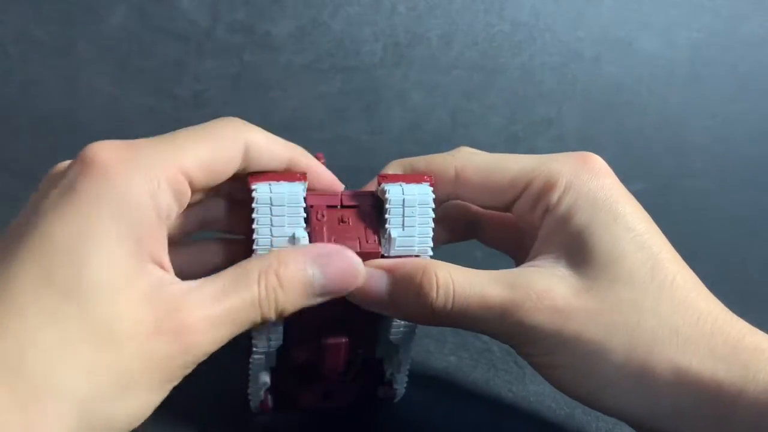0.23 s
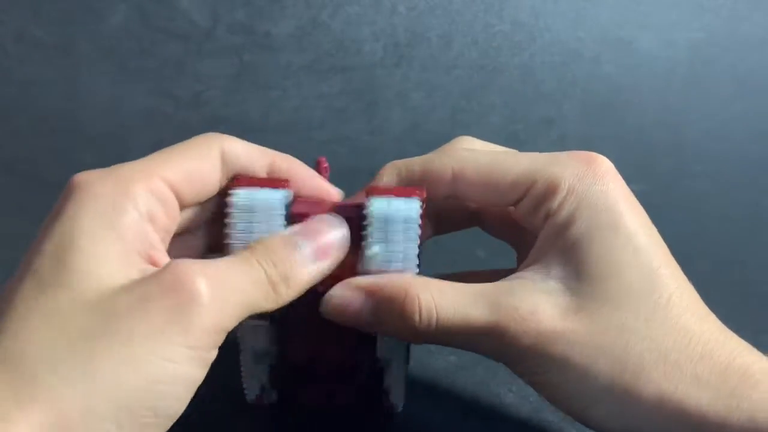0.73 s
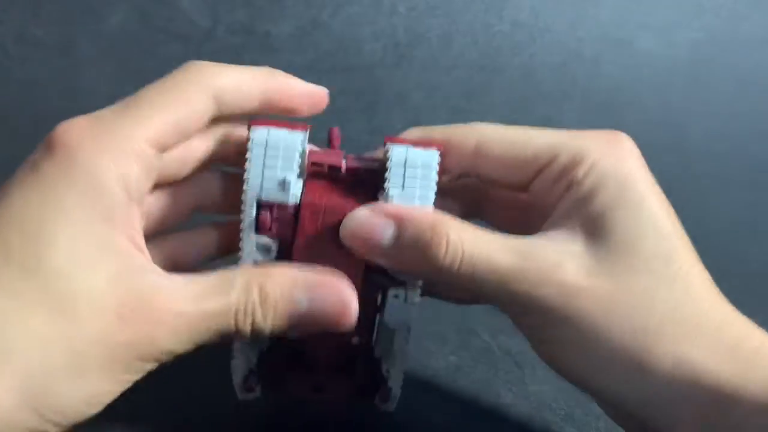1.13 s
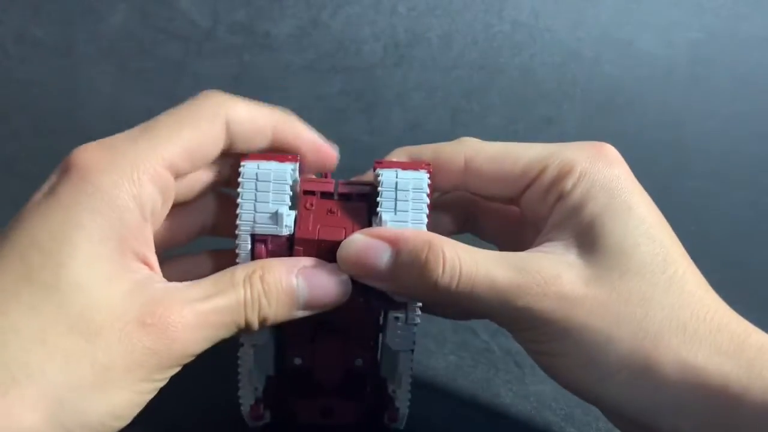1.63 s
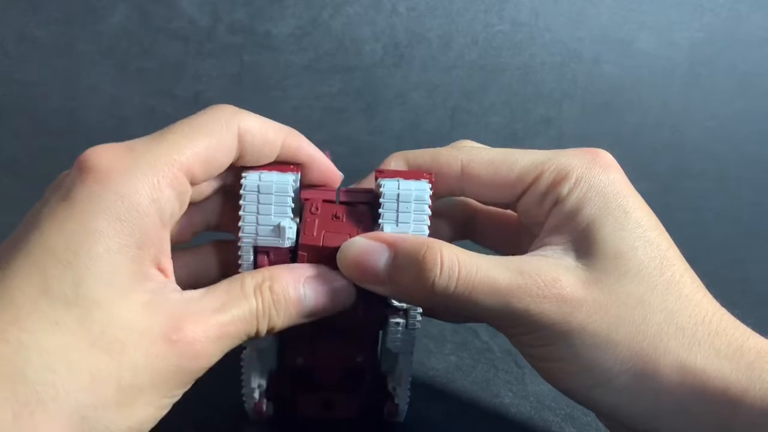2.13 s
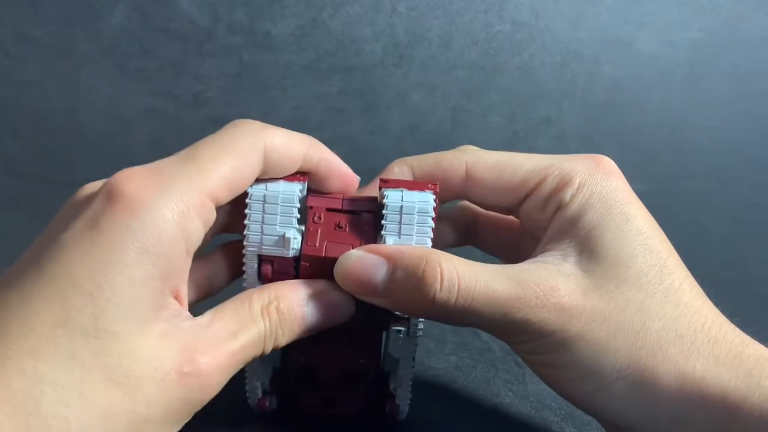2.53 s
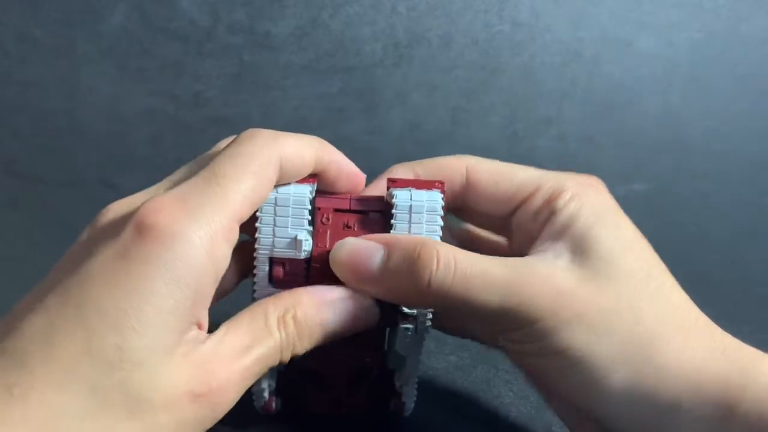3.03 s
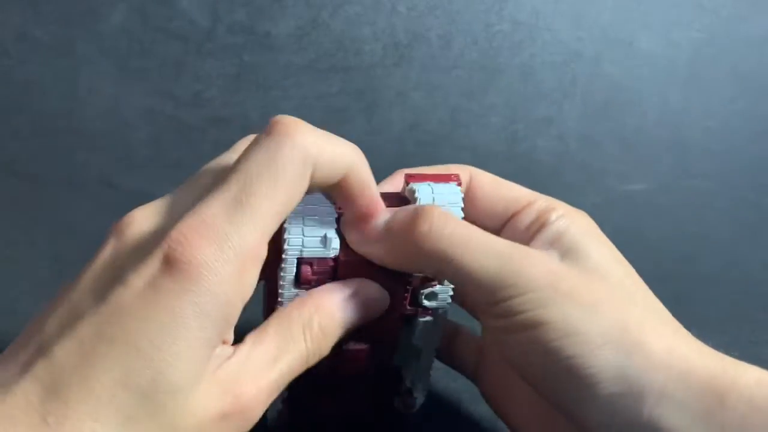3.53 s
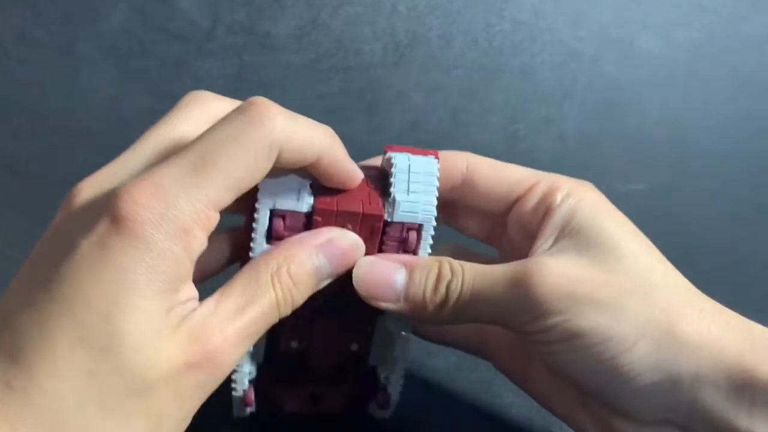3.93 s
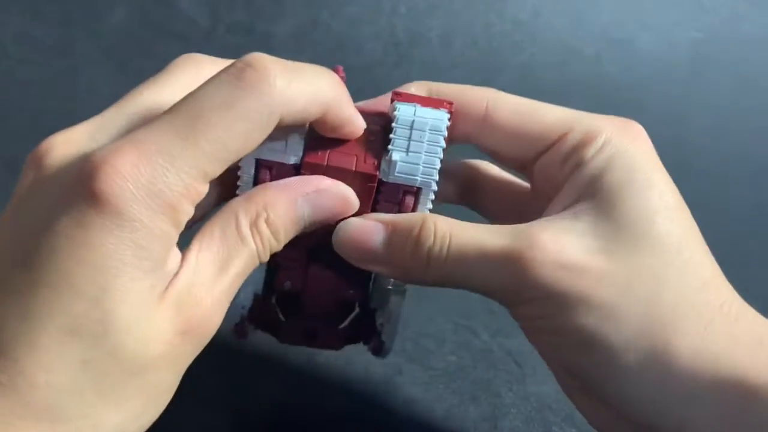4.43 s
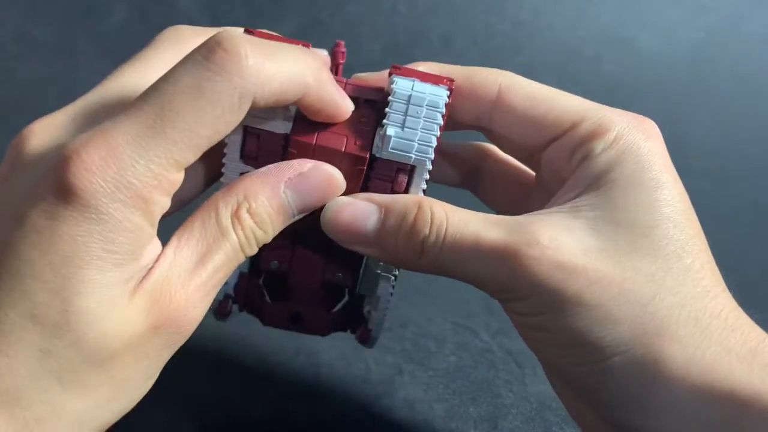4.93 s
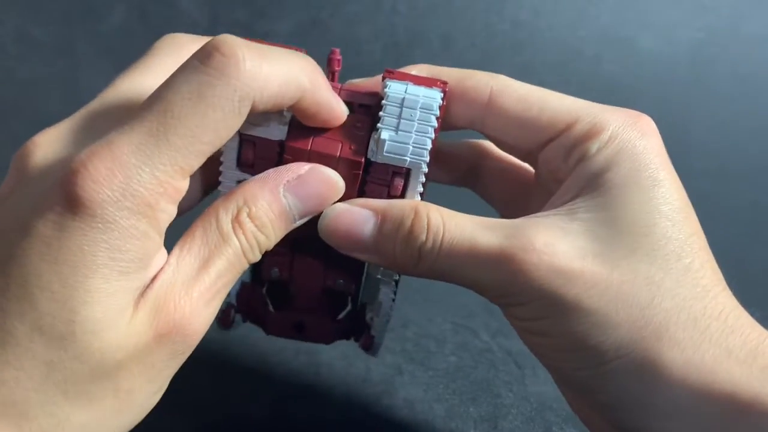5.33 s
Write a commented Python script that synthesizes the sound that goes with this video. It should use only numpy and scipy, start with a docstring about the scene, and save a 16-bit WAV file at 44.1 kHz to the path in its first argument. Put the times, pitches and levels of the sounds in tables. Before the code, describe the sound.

Hard plastic toy parts snap loudly four times, with faint ticks, rubs and a small ratchet between, in a hushed dry room.

```python
"""A hushed small, dry room: low rumble and faint hiss, then a light rub and tick of plastic before the first big snap.
Two hands fold a hard plastic toy close to a small stereo microphone; noise bursts through the shell's modes make its snaps.
Uneven tiny impacts make the rubs, a falling tone the squeak, damped low modes and dull noise the thuds in the hands.
Each snap, rub and squeak gets an answer from the room; the loudest snaps overload the input."""
import sys
import numpy as np
from scipy import signal
from scipy.fft import rfft, irfft, next_fast_len
from scipy.io import wavfile
from scipy.ndimage import uniform_filter1d, minimum_filter1d

SR = 44100
rng = np.random.default_rng(int(sys.argv[2]) if len(sys.argv) > 2 else 0)


def pcm_store(signal):
    """Save signal as 16-bit PCM."""
    levels = np.round(np.clip(np.atleast_2d(signal), -1, 1) * 32767)
    wavfile.write(sys.argv[1], SR, levels.astype(np.int16).T)


N = 245625  # samples
SIZE = 4096  # samples in a blow or force spectrum
LEAD = 256  # samples of faint noise ahead of each burst


def amp(db):
    """Decibels to gain."""
    return 10 ** (np.asarray(db) / 20)


def unit(x):
    """Scale to rms 1."""
    return x / np.sqrt(np.mean(x ** 2) + 1e-20)


def along(points, hz):
    """Read (frequency [Hz], value) points on a log frequency axis."""
    f, v = np.transpose(points)
    return np.interp(np.log(hz + 1), np.log(f + 1), v)


def filtered(x, response):
    """Multiply the spectrum of x by a response of frequency."""
    n = x.shape[-1]
    m = next_fast_len(n + SIZE)
    spectrum = rfft(x, m) * response(np.fft.rfftfreq(m, 1 / SR))
    return irfft(spectrum, m)[..., :n]


def causal(gain):
    """The minimum-phase response with this gain: it never sounds before its cause."""
    cepstrum = irfft(np.log(np.maximum(gain, 1e-6)))
    half = len(cepstrum) // 2
    fold = np.r_[1, np.full(half - 1, 2), 1, np.zeros(half - 1)]
    return np.exp(rfft(cepstrum * fold))


def add(track, s, sound):
    """Mix a sound into a track at time s [s]."""
    start = max(round(s * SR), 0)
    part = sound[..., :track.shape[-1] - start]
    track[..., start:start + part.shape[-1]] += part


def balanced(spectrum, hz, knock_db, edge_db):
    """Tilt a spectrum until its hollow and edge bands stand at these levels over the middle band."""
    def level(lo, hi):
        return 10 * np.log10(np.sum(abs(spectrum[(hz > lo) & (hz < hi)]) ** 2))

    middle = level(2000, 8500)
    low = knock_db + middle - level(600, 2000)
    high = edge_db + middle - level(9000, 15000)
    tilt_db = along([(1700, low), (2300, 0.0065), (8000, 0.003), (10000, high)], hz)
    return spectrum * causal(amp(tilt_db))


def evened(spectrum, size=101):
    """Level out the broad humps of a random spectrum and keep its fine comb."""
    return spectrum / np.sqrt(abs(uniform_filter1d(abs(spectrum) ** 2, size)) + 1e-12)


def stroke(start, end):
    """A rounded swell that covers one movement of the fingers."""
    return unit(np.hanning(max(int((end - start) * SR), 64)))


# diffuse sound at the two ports of the microphone: (frequency [Hz], left-right correlation)
PORT_LIKENESS = [(100, 0.9), (300, 0.54), (700, 0.28), (1500, 0.11), (10000, 0.081)]


def diffuse(n):
    """Stereo noise from all around: alike in the bass, nearly unrelated in the treble."""
    def mid_side(hz):
        turn = np.arccos(np.clip(along(PORT_LIKENESS, hz), -1, 1)) / 2
        return np.array([np.cos(turn), np.sin(turn)])

    mid, side = filtered(rng.standard_normal((2, n)), mid_side)
    return np.array([mid + side, mid - side])


def ports(x, lag=0.0003084):
    """Near sound reaches the right port first, by a share of lag [s]; long waves arrive at both nearly alike."""
    def response(hz):
        delay = lag * along([(1200, 0.08), (2600, 0.931)], hz)
        return np.exp(np.outer([-1j, 1j], np.pi * hz * delay))

    return filtered(x * np.ones((2, 1)), response)


# time in which the room's answer falls by 60 dB: (frequency [Hz], decay [s])
ROOM_DECAY = [(100, 0.18), (500, .23), (1400, 0.21), (3700, 0.19), (9700, .24), (15000, 0.022)]
# tone of table and walls: (frequency [Hz], relative level [dB])
ROOM_TONE = [(100, 5.5), (400, 1), (1200, -2), (2600, 7), (5000, -4), (8000, -6), (11000, -9),
             (13500, -2.5), (15500, -10.5)]


def room(x, build=0.0007, patchy_db=4.5):
    """The answer of table and walls: diffuse noise that builds in build [s] and dies at its own speed per frequency."""
    hz, t, z = signal.stft(diffuse(SR // 2), SR, nperseg=256)
    # some pitches linger, others cancel
    patches = unit(uniform_filter1d(rng.standard_normal(z.shape[1:]), size=13, axis=1))
    tone_db = along(ROOM_TONE, hz)[:, None]
    decay_db = -60 * t / along(ROOM_DECAY, hz)[:, None]
    tail = signal.istft(z * amp(tone_db + decay_db + patchy_db * patches), SR, nperseg=256)[1]
    t = np.arange(tail.shape[1]) / SR
    tail = tail * (1 - np.exp(-t / build))
    return signal.fftconvolve(x[None], tail / np.linalg.norm(tail[0]), axes=1)


# spectrum of the quiet room: (frequency [Hz], relative level [dB])
HUSH_TONE = [(20, -14), (45, -6), (72, -1), (115, -7.5), (190, -14.5), (290, -15), (500, -22.5),
             (1500, -30), (4000, -32), (8000, -35.5), (13800, -31.5), (15200, -75)]


def hush(level_db=-63):
    """The quiet room: diffuse noise shaped into low rumble and a faint hiss."""
    return amp(level_db) * unit(filtered(diffuse(N), lambda hz: amp(along(HUSH_TONE, hz))))


def ring(db, hz, t60, attack=0.001):
    """One damped mode: a sine that falls by 60 dB in t60 [s]."""
    t = np.arange(SR // 3) / SR
    return amp(db - 60 * t / t60) * (1 - np.exp(-t / attack)) * np.sin(2 * np.pi * hz * t)


# spectrum of fingers on plastic: (frequency [Hz], relative level [dB])
SKIN_TONE = [(40, -15.5), (100, 2), (280, -2.5), (480, -13.5), (800, -18), (2000, -31)]


def skin(n):
    """The dull noise of fingers on the shell."""
    return unit(filtered(diffuse(n), lambda hz: amp(along(SKIN_TONE, hz))))


# modes of the toy on the soft fingers: (nominal frequency [Hz], relative level [dB], 60 dB decay [s])
HELD_MODES = [(86.6, 0, 0.12), (148, -8, .17), (271, -14, 0.24), (437, -12.5, 0.089)]
# the toy jolts in the hands when a tab lets go: (time [s], level [dB], hardness [dB per octave])
HAND_JOLTS = [(.711, -25.5, -3), (1.229, -50.5, 2.5), (1.804, -48, -1), (2.764, -59.5, 8.5),
              (3.016, -47, -1), (3.394, -28, -2), (3.694, -29.5, 4)]
# fingertips shifting their grip: (start [s], end [s], level [dB])
GRIP_SHIFTS = [(0.944, 1.109, -52), (1.935, 2.057, -63), (3.136, 3.31, -59), (3.72, 3.872, -55)]


def hands(flesh_db=-12, flesh_t60=0.26, grip_octaves=0.21):
    """Soft, low sounds: jolts ring modes tuned a little anew by each grip, and shifting fingers make dull noise."""
    out, t = np.zeros((2, N)), np.arange(SR // 3) / SR
    lowest_hz = HELD_MODES[0][0]
    for s, db, hardness_db in HAND_JOLTS:
        for hz, mode_db, t60 in HELD_MODES:
            level = db + mode_db + hardness_db * np.log2(hz / lowest_hz)
            tuned_hz = hz * 2 ** (grip_octaves * rng.standard_normal())
            add(out, s, ring(level, tuned_hz, t60))
        add(out, s, amp(db + flesh_db - 60 * t / flesh_t60) * skin(len(t)))
    for start, end, db in GRIP_SHIFTS:
        swell = stroke(start, end)
        add(out, start, amp(db) * swell * skin(len(swell)))
    return out


# a joint chirps as it settles: (time [s], length [s], level [dB], nominal first [Hz], nominal last [Hz])
JOINT_CHIRP = (3.787, .03, -51, 1620, 1470)


def squeak(waver=0.049, size=40):
    """A tight joint chirps once as it settles, falling unsteadily in pitch."""
    s, length, db, start_hz, end_hz = JOINT_CHIRP
    u = np.linspace(0, 1, int(length * SR))
    wander = unit(uniform_filter1d(rng.standard_normal(len(u)), size))
    hz = (start_hz + (end_hz - start_hz) * u) * (1 + waver * wander)
    sound = amp(db) * unit(u * (1 - u) ** 3) * np.sin(2 * np.pi * np.cumsum(hz) / SR)
    out = np.zeros((2, N))
    add(out, s, sound)
    add(out, s, 0.5 * room(sound))
    return out


# spectrum of sliding plastic: (frequency [Hz], relative level [dB])
SLIDE_TONE = [(200, -14), (700, -6.5), (1300, -4), (2500, -2.5), (4000, 5.5), (7300, 5.5), (8700, 5),
              (10400, -3.5), (11900, -6), (13400, -8.5), (15500, -13)]
# plastic sliding on plastic: (start [s], end [s], relative level [dB], sharp edge over middle band [dB])
PLASTIC_RUBS = [(0.113, 0.174, -65, -2), (0.63, 0.77, -51.5, -3.5), (0.956, 1.081, -52.5, 5.5),
                (1.061, 1.127, -58.5, 5), (1.141, 1.174, -59, 0), (1.346, 1.375, -49, 13),
                (1.385, 1.478, -61, 2), (1.911, 2.089, -60, 3), (2.655, 2.719, -51, 7),
                (2.877, 2.93, -58, 14), (3.032, 3.088, -57.5, 9.5), (3.181, 3.252, -61, 10.5),
                (3.335, 3.393, -56, 1), (3.504, 3.619, -63.5, -3.5), (3.613, 3.704, -52.5, -0.5),
                (3.764, 3.887, -59, -9), (4.15, 4.263, -64.5, 3.5), (5.336, 5.418, -59.5, -5.5)]
RUB_KNOCK_DB = -7.5  # hollow band of every rub, over its middle band


def rubs(slips_per_s=400, slip_db=5.5, smooth=0.36, level_db=-2, wet_db=-7):
    """Sliding faces catch and slip: tiny uneven impacts over a fine hiss."""
    out, hz = np.zeros((2, N)), np.fft.rfftfreq(SR // 2, 1 / SR)
    for start, end, db, edge_db in PLASTIC_RUBS:
        swell = stroke(start, end)
        chance = rng.random(SR // 2)
        size, hiss = rng.standard_normal((2, SR // 2))
        slips = (chance < slips_per_s / SR) * amp(slip_db * size) * np.sign(hiss)
        force = slips + smooth * hiss
        coloured = rfft(force) * causal(amp(along(SLIDE_TONE, hz)))
        rub = irfft(balanced(coloured, hz, RUB_KNOCK_DB, edge_db))
        # the pressure is never even
        pressure = amp(0.4 * unit(uniform_filter1d(rng.standard_normal(len(swell)), size=200)))
        sound = amp(db + level_db) * swell * unit(pressure * rub[:len(swell)])
        add(out, start, ports(sound))
        add(out, start, amp(wet_db) * room(sound))
    return out


# modes of the plastic shell: (frequency [Hz], width [Hz], relative level [dB])
SHELL_MODES = [(1000, 220, -6), (1375, 60, -5.5), (2080, 1800, -5), (2473, 37, 4), (3220, 29, -5.5),
               (3745, 47, 0), (4250, 470, 2.5), (4774, 510, -0.5), (5230, 350, 2), (6240, 84, 0),
               (6780, 180, -4), (7720, 1600, -2.5), (9060, 120, -3), (10376, 1400, 3.5), (13180, 580, 5)]
# bare contact: (frequency [Hz], relative level [dB])
CRACK_TONE = [(60, -30.5), (200, -13.5), (450, -4.5), (760, -14), (1150, -3), (3000, -1), (8000, -5),
              (13900, -7.5), (15000, -13), (17000, -28)]


def shell(tab_hz, tab_db, knock_db, edge_db, tab_octaves=0.22, overtone=0.14, crack_db=-9):
    """The spectrum of one blow: shell modes and a bare crack, lifted at the pitch of the struck tab and its octave."""
    hz = np.fft.rfftfreq(SIZE, 1 / SR)
    modes = 0
    for centre, width, db in SHELL_MODES:
        damping = (hz * width) ** 2
        modes = modes + amp(db) ** 2 * damping / ((centre ** 2 - hz ** 2) ** 2 + damping)
    body = np.sqrt(modes + amp(crack_db + along(CRACK_TONE, hz)) ** 2)

    def hump(centre):
        return np.exp(-0.5 * (np.log2((hz + 1) / centre) / tab_octaves) ** 2)

    tab = amp(tab_db * (hump(tab_hz) + overtone * hump(2 * tab_hz)))
    return balanced(causal(body * tab), hz, knock_db, edge_db)


def snap(length, swell=0.24, chatter_db=-24, chatter_t60=0.12, apart=0.65):
    """The force spectrum of a tab scraping over its catch: a swelling burst, then a short chatter of loose parts."""
    t = np.arange(SIZE) / SR
    u = t / (max(length, 0.0003) * swell)
    burst = (u / 2) ** 2 * np.exp(2 - u)
    chatter = amp(chatter_db - 60 * t / chatter_t60) * (1 - np.exp(-u))
    # each port sees the toy from its own angle
    contacts = rng.standard_normal(SIZE) + apart * rng.standard_normal((2, SIZE))
    return evened(rfft((burst + chatter) * contacts))


def lead_in(level_db=-24, rise_db=14):
    """A faint noise swells for a few milliseconds ahead of each click."""
    noise = amp(np.linspace(-rise_db, 0, LEAD)) * rng.standard_normal((2, LEAD))
    return amp(level_db) * unit(noise) / np.sqrt(LEAD)


RATCHET_S, NOTCH_S, NOTCH_HZ = 2.1702, 0.0328, 3784  # first notch [s], spacing [s], tab pitch [Hz]
NOTCH_DB, MID_TURN_DB = -48, 4  # level of the first notch; rise towards the middle


def ratchet(count=5, length=0.001635, tab_db=10, knock_db=-14, edge_db=-7):
    """A stiff joint turns notch by evenly spaced notch, hardest in mid-turn; returns click rows."""
    rows = []
    for k in range(count):
        db = NOTCH_DB + MID_TURN_DB * np.sin(np.pi * k / count)
        rows.append((RATCHET_S + k * NOTCH_S, db, length, NOTCH_HZ, tab_db, knock_db, edge_db))
    return rows


# loose parts tick at random while the fingers press: (start [s], end [s], mean level [dB])
FINGER_PRESSES = [(1.934, 2.07, -54.5), (2.351, 2.504, -53.5), (2.962, 3.142, -47), (4.071, 4.22, -55.5)]
TICKS_PER_S, TICK_SPREAD_DB, TICK_SPREAD_OCTAVES = 15, 5, 0.39
# the usual light contact: nominal length [s], median tab pitch [Hz], then band levels
TICK_S, TICK_HZ, TICK_TAB_DB, TICK_KNOCK_DB, TICK_EDGE_DB = 0.003, 3640, 14, -4, 1


def loose_ticks():
    """Faint ticks scattered through each press, with random strength and pitch; returns click rows."""
    rows = []
    for start, end, db in FINGER_PRESSES:
        count = max(round((end - start) * TICKS_PER_S), 1)
        for k in range(count):
            s = start + (end - start) * (k + rng.random()) / count
            strength, pitch = rng.standard_normal(2)
            hz = TICK_HZ * 2 ** (TICK_SPREAD_OCTAVES * pitch)
            tick_db = db + TICK_SPREAD_DB * strength
            rows.append((s, tick_db, TICK_S, hz, TICK_TAB_DB, TICK_KNOCK_DB, TICK_EDGE_DB))
    return rows


# tabs snapping and parts knocking: (time [s], level of the energy packed into 1 ms [dB],
# nominal contact length [s], tab pitch [Hz], tab resonance [dB], hollow knock over middle band [dB],
# sharp edge over middle band [dB])
TAB_CLICKS = [(0.18, -48.5, 0.0038, 3500, 12, -14, -18), (0.7063, 2, 0.0035, 3280, 6.5, -9.5, -2),
              (0.726, -26.5, 0.0019, 3300, 10, -7.5, -8), (0.842, -42, 0.0034, 2790, 12, 0, -3),
              (0.856, -29, 0.0042, 3850, 5.5, -8.5, -14), (0.951, -44, .002, 7160, 20, -12, -9),
              (0.967, -40, 0.0037, 4700, 11, -12, -11), (0.984, -34, .0037, 4800, 15, -10, 3),
              (1.039, -35, 0.0087, 4400, 6.5, 11.5, 15.5), (1.166, -30, 0.0095, 2930, 7, 3.5, -6),
              (1.1798, -14.5, 0.001, 6900, 10.5, -11, -1), (1.229, -14.5, 0.0046, 3380, 5.5, -9.5, -4.5),
              (1.3651, -29.5, 0.0035, 4080, 4.5, -11, -11), (1.504, -45, 0.0032, 2900, 9, 6.5, -11),
              (1.7974, -2.5, 0.0014, 5433, 14.5, -20, -4.5), (2.5826, -49, 0.0021, 7400, 12.5, -12, -3),
              (2.6214, -50.5, .004, 3050, 5.5, 5.5, -4), (2.6652, -44.5, .003, 4220, 1, -6, -7),
              (2.766, -46.5, 0.002, 4900, 5, -7.5, -13), (2.7924, -46, .0017, 5300, 11, -27, -16),
              (2.948, -51, .002, 4550, 12.5, -11, -6), (3.014, -37, 0.0023, 3420, 6, -2.5, -12),
              (3.1657, -36.5, 0.0022, 3040, 2, 6.5, -1), (3.1819, -27.5, 0.0011, 3100, 8, -5, -8.5),
              (3.221, -35, 0.00085, 2700, 9, -9, -1.5), (3.333, -31, 0.0019, 3400, 1, -8.5, 5),
              (3.352, -49, 0.0029, 3987, 4, -8.5, -7), (3.384, -4, .004, 3200, 7.5, -11.5, -2.5),
              (3.5489, -30.5, 0.0011, 3200, 5.5, -5.5, -18), (3.6058, -28.5, .002, 2500, 5, 0, -1.5),
              (3.682, -23, 0.007, 6900, 2, -13, -5.5), (3.6901, 3.5, 0.0025, 7100, 7.5, -17.5, -6.5),
              (4.307, -52.5, 0.0021, 2860, 18, -23, -9), (4.35, -47, 0.0021, 3900, 6, -17, -8.5),
              (4.8064, -41, 0.008, 3100, 16.5, -3.5, -7.5), (5.3728, -37.5, 0.0091, 3630, 14.5, -11.5, -12),
              (5.4928, -46, 0.0015, 3300, 16, 1, -13)]
# room share of a 0 dB click, and its change per dB of click level:
# faint ticks, hidden by the fingers, come more by way of the room
WET_DB, WET_PER_DB = -12, -0.03


def clicks():
    """Every snap and tick: a scraping force drives the shell, and the room answers each blow."""
    out = np.zeros((2, N))
    for s, db, length, tab_hz, tab_db, knock_db, edge_db in TAB_CLICKS + ratchet() + loose_ticks():
        blow = irfft(shell(tab_hz, tab_db, knock_db, edge_db))
        blow = amp(db) * blow / np.linalg.norm(blow) * np.sqrt(SR / 1000)
        extra = 0.0009 * min(amp(db), 1)  # louder clicks last slightly longer
        force = np.roll(irfft(snap(length + extra)), LEAD, axis=1)
        add(force, 0, lead_in())
        direct = ports(signal.fftconvolve(force, blow[None], axes=1))
        add(out, s - LEAD / SR, direct)
        add(out, s + length / 2, amp(WET_DB + WET_PER_DB * db) * room(blow))
    return out


def scene():
    """Room, hands and toy, from the background to the snaps."""
    return hush() + hands() + squeak() + rubs() + clicks()


# narrow dips in the overall tone: (frequency [Hz], width [octaves], depth [dB])
TONE_DIPS = [(780, .13, -4), (8800, .04, -7), (11850, .03, -10)]


def dipped_tone(hz):
    """The gain of a tone flat but for a few narrow dips."""
    dips_db = 0
    for centre, width, db in TONE_DIPS:
        dips_db = dips_db + db * np.exp(-0.5 * (np.log2((hz + 1) / centre) / width) ** 2)
    return amp(dips_db)


TOP_HZ = 15800  # upper band limit


def record(dry, ceiling=1.3, size=20):
    """A fast limiter tames the loudest snaps and their tips still clip; then dips in tone and a band limit."""
    needed = ceiling / np.maximum(abs(dry).max(axis=0), ceiling)
    gain = uniform_filter1d(minimum_filter1d(needed, size), size)
    clipped = np.clip(gain * dry, -1, 1)
    dips = irfft(causal(dipped_tone(np.fft.rfftfreq(SIZE, 1 / SR))))
    toned = signal.fftconvolve(clipped, dips[None], axes=1)[:, :N]
    band_limit = signal.ellip(10, 0.1, 70, TOP_HZ, fs=SR, output="sos")
    return signal.sosfilt(band_limit, toned)


dry = scene()
out = record(dry)
pcm_store(out)
```